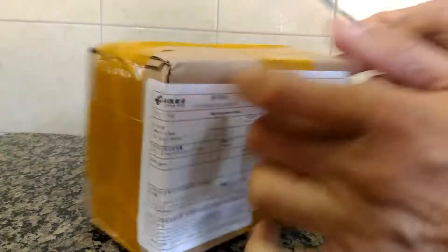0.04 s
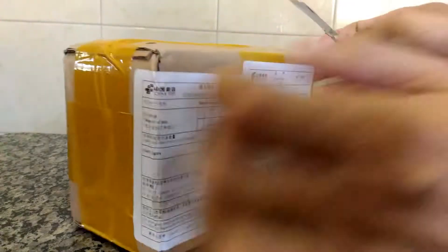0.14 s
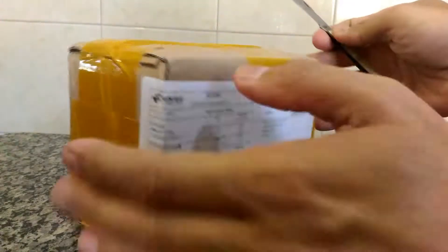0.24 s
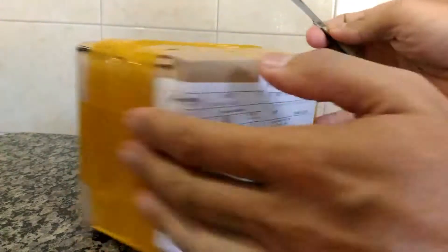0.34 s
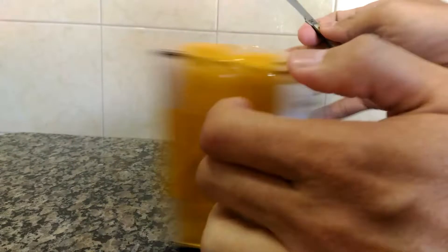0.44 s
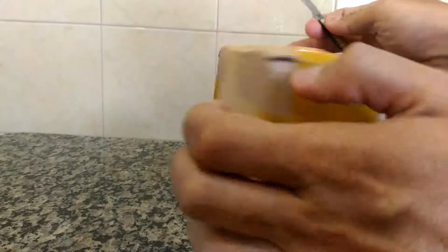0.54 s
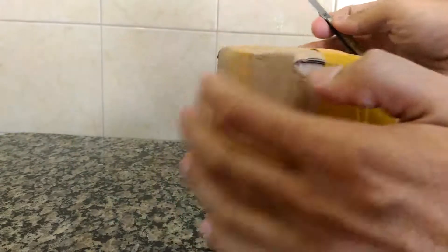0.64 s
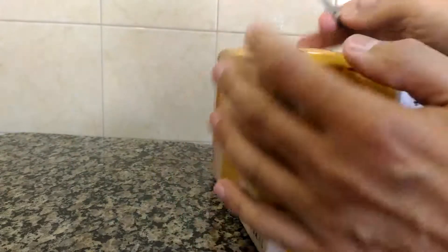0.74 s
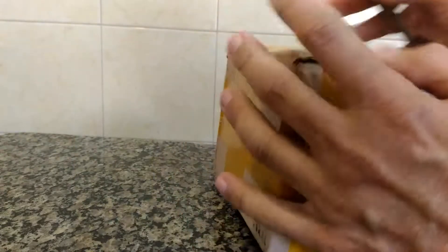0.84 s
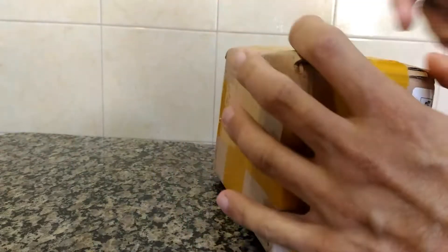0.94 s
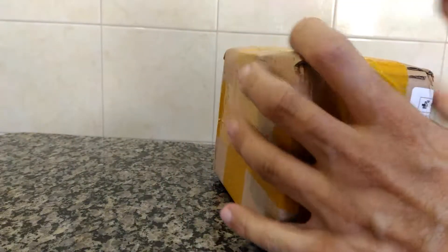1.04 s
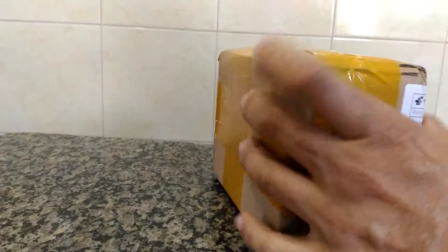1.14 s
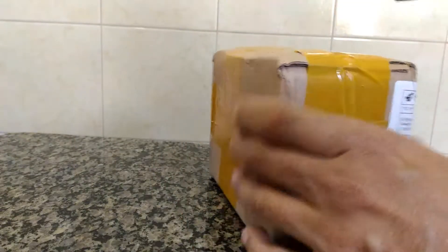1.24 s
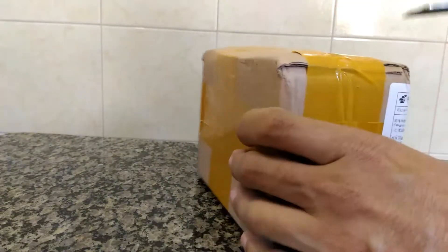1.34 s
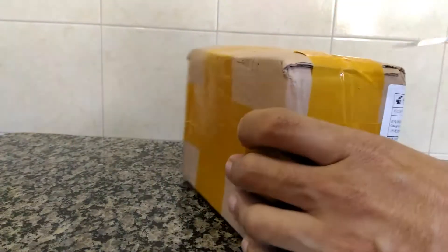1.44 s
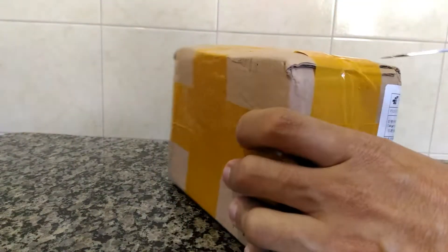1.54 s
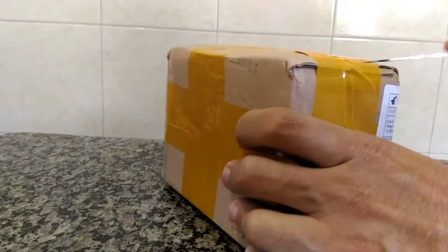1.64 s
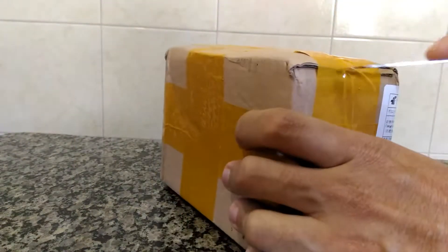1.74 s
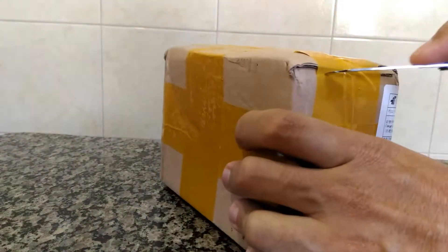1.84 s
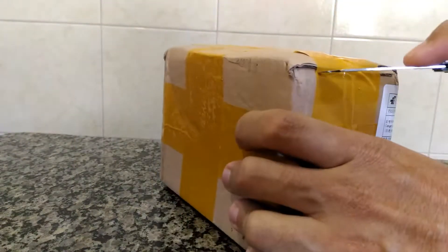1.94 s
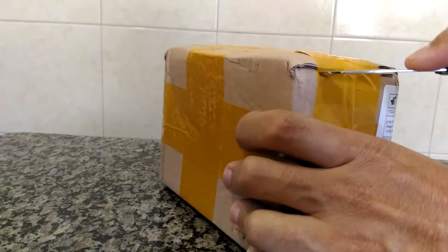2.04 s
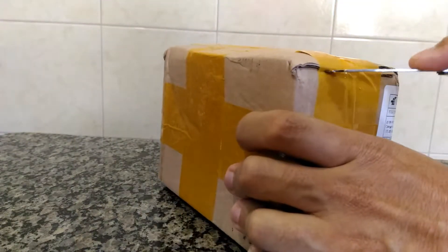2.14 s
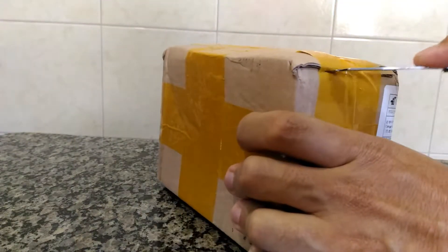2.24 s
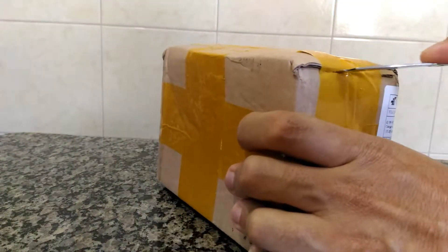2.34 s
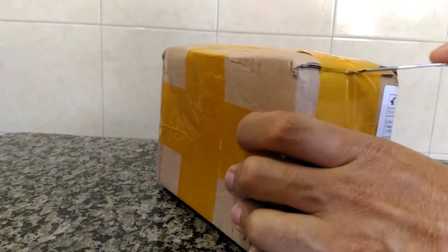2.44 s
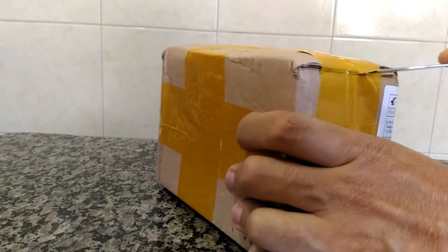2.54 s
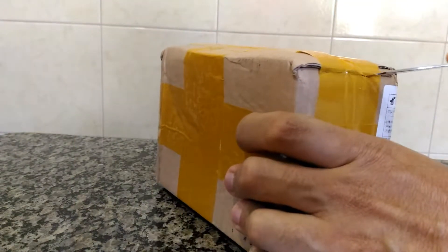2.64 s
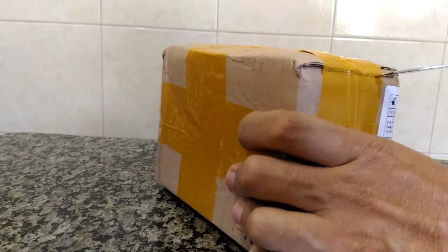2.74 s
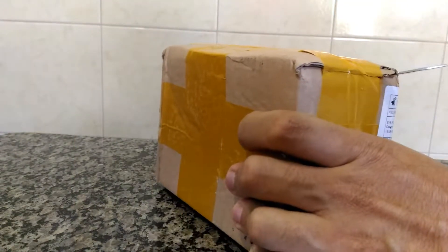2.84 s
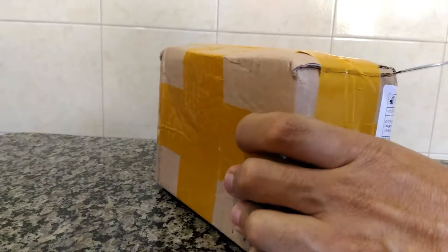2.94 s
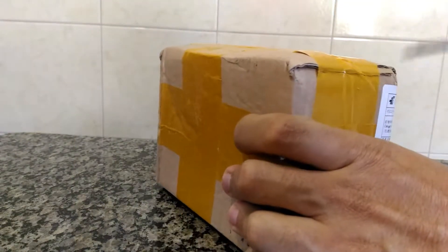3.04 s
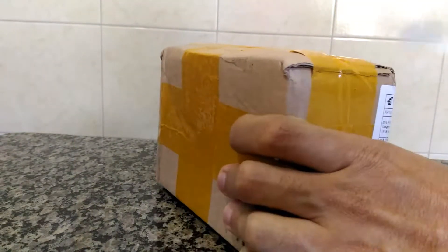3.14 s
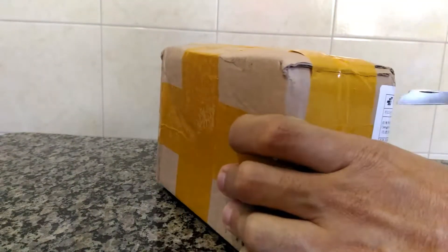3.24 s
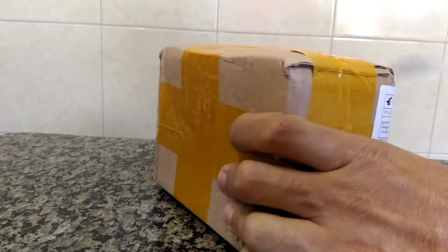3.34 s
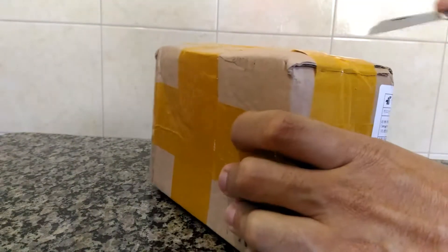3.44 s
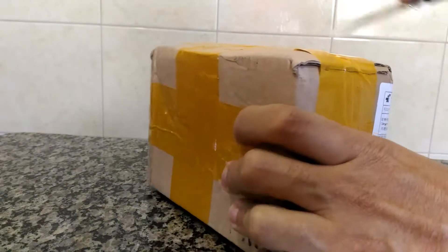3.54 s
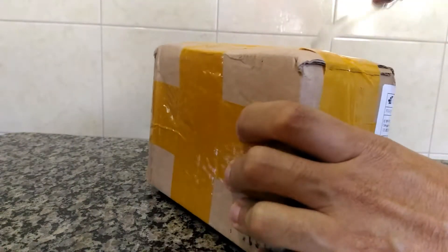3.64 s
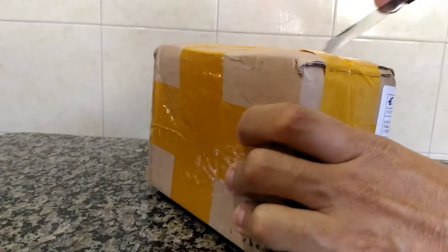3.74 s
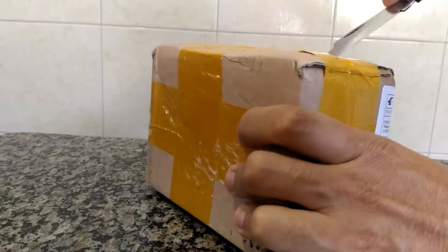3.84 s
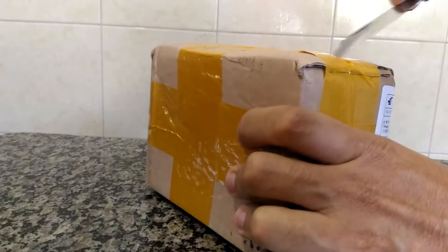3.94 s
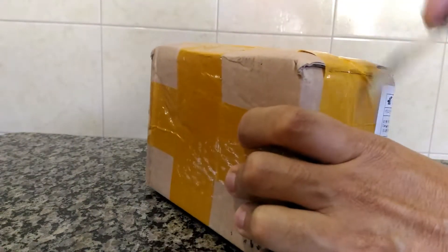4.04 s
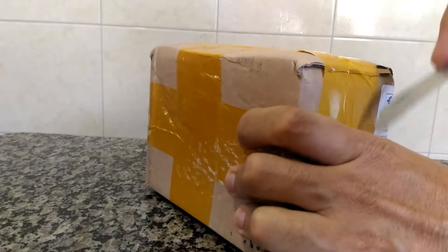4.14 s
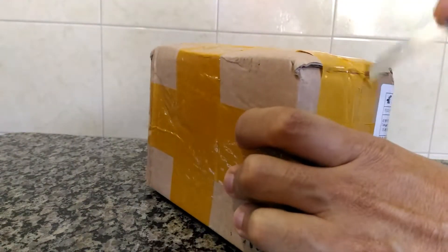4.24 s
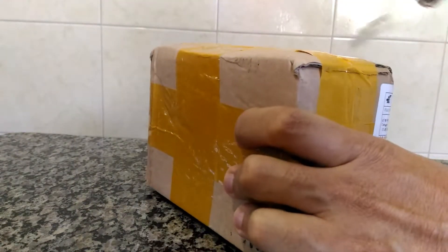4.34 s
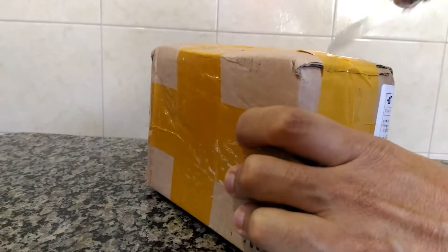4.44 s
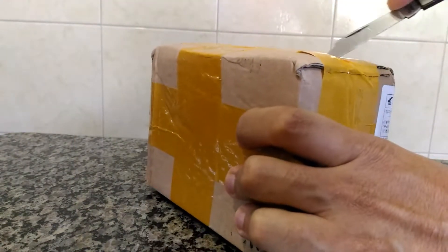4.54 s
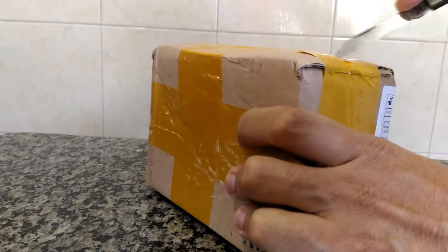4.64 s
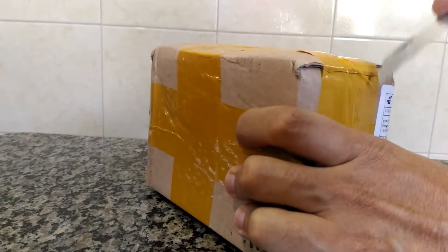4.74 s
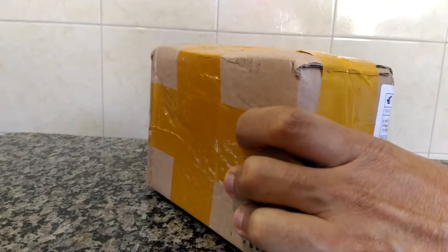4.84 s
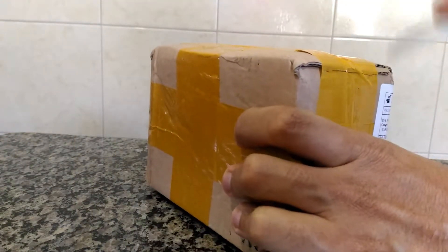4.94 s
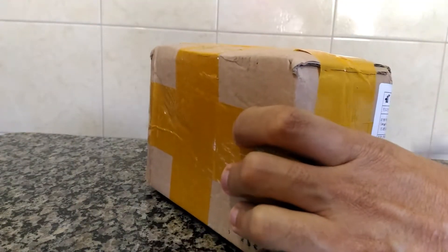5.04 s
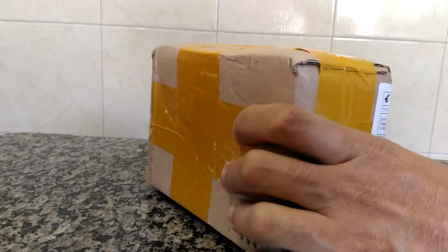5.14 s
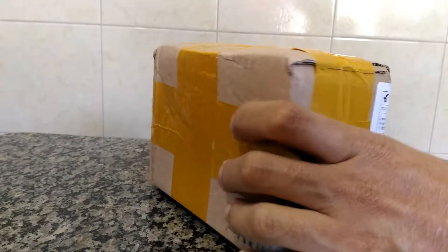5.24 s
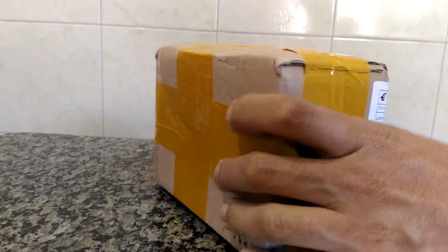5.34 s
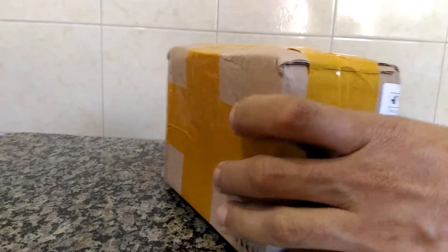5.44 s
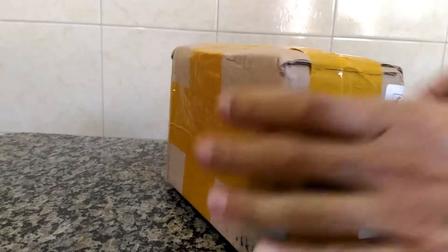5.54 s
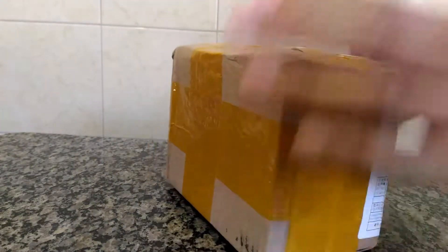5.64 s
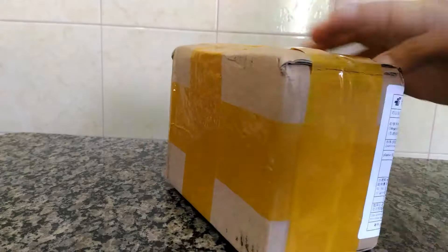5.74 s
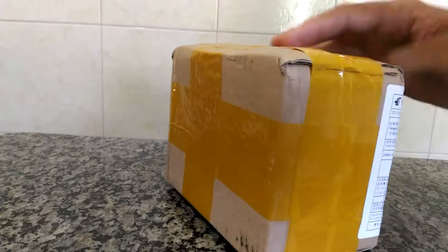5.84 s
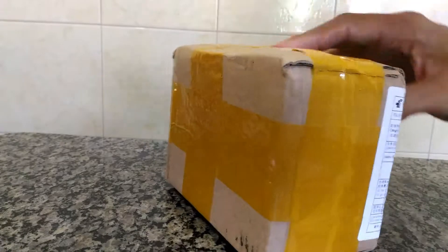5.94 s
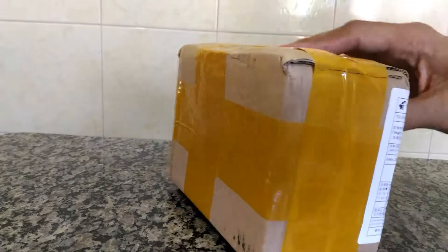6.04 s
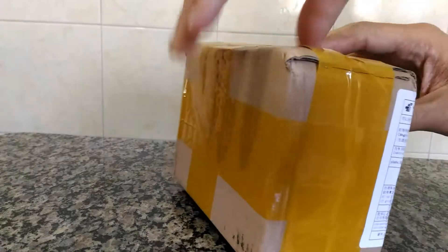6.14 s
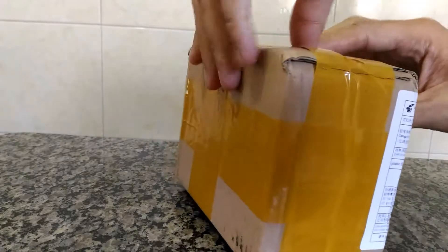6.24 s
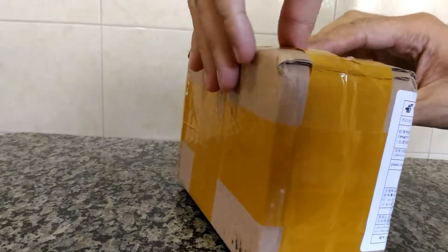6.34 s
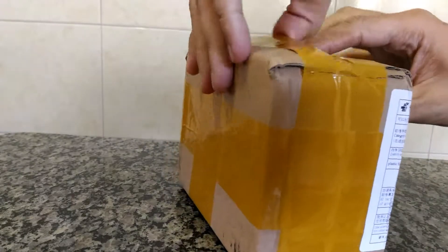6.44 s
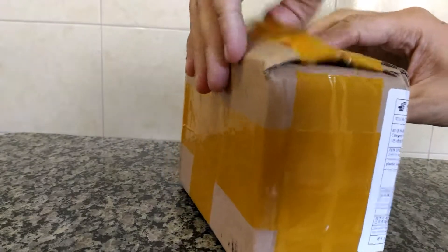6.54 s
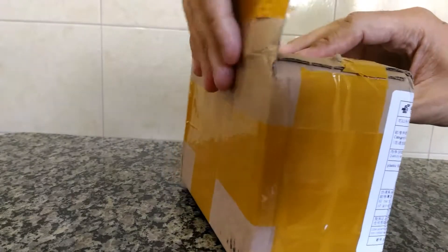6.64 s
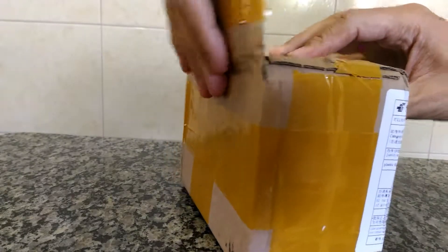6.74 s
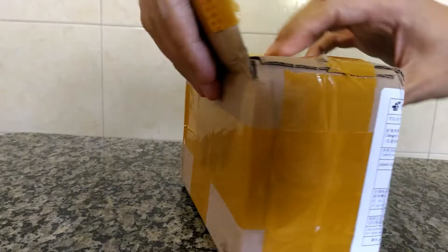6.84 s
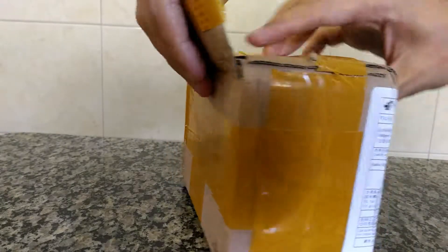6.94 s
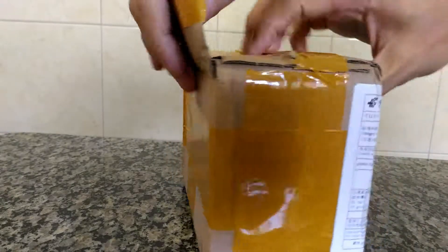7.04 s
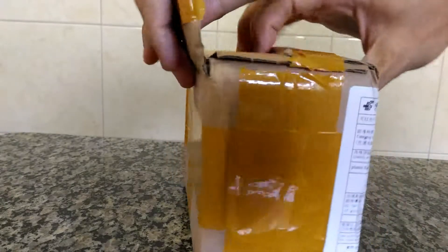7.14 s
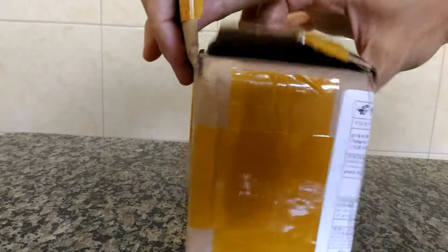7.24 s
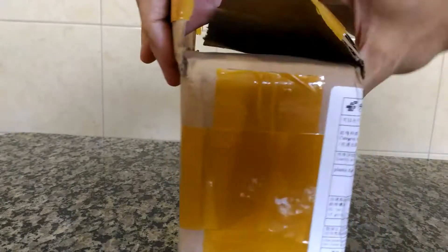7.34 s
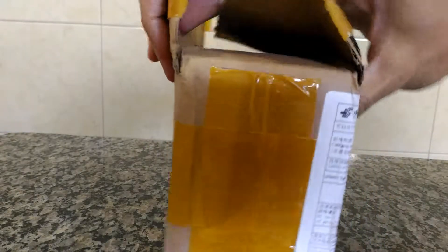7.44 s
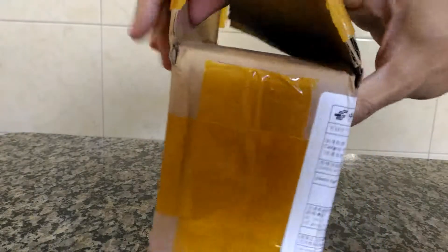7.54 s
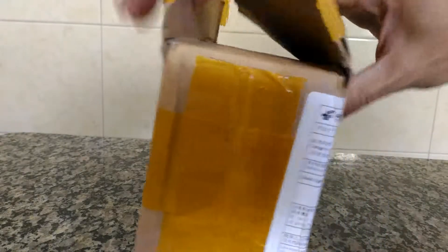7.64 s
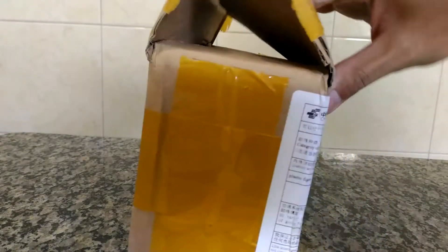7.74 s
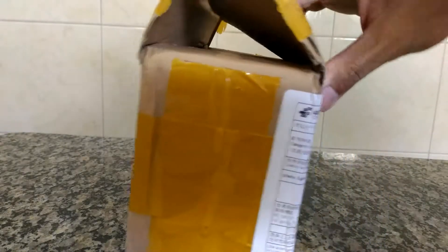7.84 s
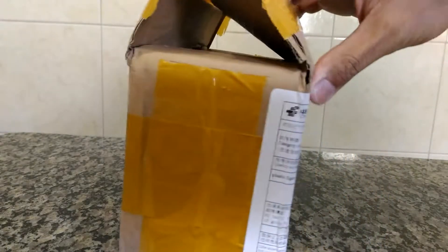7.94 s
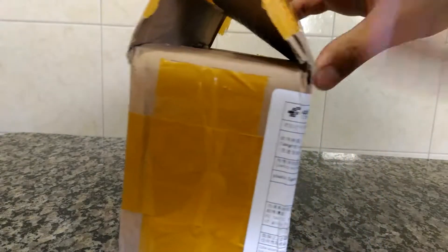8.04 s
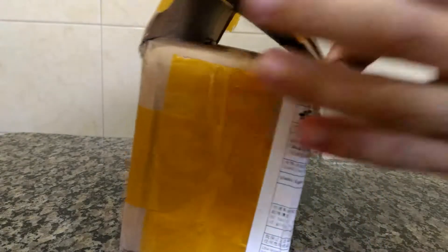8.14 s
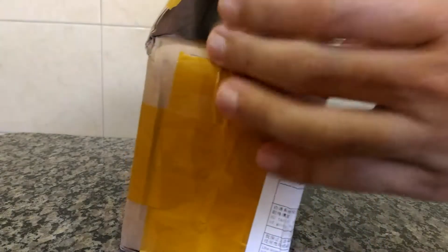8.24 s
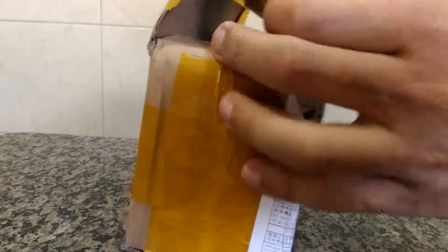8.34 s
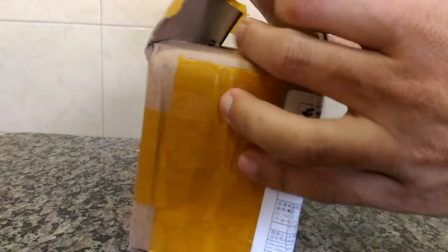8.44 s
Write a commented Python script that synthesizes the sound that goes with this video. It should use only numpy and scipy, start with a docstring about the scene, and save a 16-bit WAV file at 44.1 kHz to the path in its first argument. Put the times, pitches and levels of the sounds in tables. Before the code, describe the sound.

A close stereo microphone in a small, hard tiled room with quiet low background noise. From 0 to 2 seconds hands rub, bump and swish over a taped hollow cardboard box, with little crinkles and a scuff on stone near 1.0. From 2.2 to 2.9 a blade slips through tape in about nine crisp, uneven pops over soft box thumps. After faint rubbing, jabs and tiny rips come at 3.8 to 4.1, with more jabs near 4.75. At 5.2 to 5.55 the knife lands to the right, clacking and rattling with a short steel ring. A bump at 6.07 leads to rubbing; tape pops at 6.5 to 6.66, the last with a big hollow thump. Flaps scrape and groan from 7.26, a sharp snap hits at 7.38, ripping follows near 7.8, a smaller pop at 8.1, then final handling around 8.4.

```python
"""Hands rub, bump and crinkle a taped cardboard parcel as it is turned on a stone counter in a small tiled room.
A knife point then pops through the tape in short slips and jabs the seam, and the knife is put down on the stone.
The flaps are pulled up, groaning, and the last tape snaps. Each slip is a burst of noise grains shaped by tape
and card, with a thump from the hollow box's modes. Grains also make the rubs and the knife's clack and ring;
dense fading reflections and two standing waves make the room, over a quiet noise background."""
import sys
import numpy as np
from scipy import signal
from scipy.io import wavfile
from scipy.ndimage import uniform_filter1d

SR = 44100
rng = np.random.default_rng(int(sys.argv[2]) if len(sys.argv) > 2 else 0)


def inscribe(sig):
    """Save sig as 16-bit PCM at rate SR to the path in sys.argv[1].

    A 1-D sig is mono; a 2-D sig holds one channel per row.
    Samples are clipped to [-1, 1] before scaling.
    """
    pcm = np.round(np.clip(np.atleast_2d(sig).T, -1, 1) * 32767)
    wavfile.write(sys.argv[1], SR, pcm.astype(np.int16))


N = 373527  # length in samples

# grip shifts, blade drags and flap rubs: start_s, hold_s, skin_and_card_hiss_db, box_drone_db
RUB_STROKES = [(0, 0.22, -64, -60), (0.396, 0.24, -61, -59.5), (.8, .12, -76, -68),
               (1.115, 0.39, -63.5, -64), (1.5, 0.12, -63, -59), (1.87, 0.1, -87, -84),
               (2.103, 0.22, -97, -64), (2.33, .7, -63.5, -60), (3.033, 0.25, -78, -64),
               (3.56, 0.12, -66.5, -60), (3.747, .07, -63.5, -60), (4.264, 0.72, -84, -74),
               (4.53, .04, -67, -61), (4.686, .11, -61, -57), (5.867, 0.52, -71.5, -61),
               (6.405, .18, -59, -59), (6.66, 0.77, -61.5, -61), (7.26, 0.45, -54, -54.5),
               (8.013, 0.26, -58, -60.5), (8.407, .07, -49.5, -51)]
# a hand or the knife bumps the box: start_s, level_db, stiffness_tilt_db_per_octave of the box modes
BOX_BUMPS = [(0.0426, -51, -22), (0.169, -57, 5), (0.425, -51, 3), (0.439, -51, 3), (1.579, -59, -7),
             (3.674, -55.5, -8), (5.969, -59, 10), (6.068, -41.5, 8), (6.3212, -57.5, -1), (7.137, -50, 7),
             (7.715, -46.5, 9), (8.273, -55, -12), (8.3694, -55, 12.5)]
# tape crinkles under a finger or the blade: start_s, level_db
TAPE_CRINKLES = [(0.0435, -60.5), (0.085, -61.5), (0.094, -56.5), (0.423, -61), (0.438, -61), (1.993, -74),
                 (2.2027, -58), (2.771, -58), (3.214, -69), (3.7673, -62.5), (6.3213, -57), (7.081, -54.5),
                 (7.767, -55), (8.0666, -55.5), (8.3704, -50.5)]
# fingers sweep over the taped sides: start_s, length_s, level_db
FINGER_SWISHES = [(0.057, 0.023, -60), (0.513, 0.065, -55.5), (0.818, 0.037, -57.5), (1.145, 0.064, -57.5),
                  (1.245, 0.069, -57.5), (1.317, 0.081, -57.5), (1.427, 0.3, -70), (6.46, 0.18, -59.5),
                  (7.741, 0.064, -52)]
# the turning box or the knife scuffs the stone: start_s, length_s, level_db
STONE_SCUFFS = [(1.011, 0.05, -51), (5.345, .016, -52)]
# the blade slips forward through the tape:
# start_s, crack_db, card_knock_db (against the crack), box_thump_db, tape_pitch_hz
BLADE_SLITS = [(2.2093, -53, -0.5, -51.5, 7130), (2.226, -53.5, -7, -57, 5800),
               (2.394, -43.5, -9.5, -44.5, 6700), (2.4947, -38.5, -5.5, -47.5, 5230),
               (2.5602, -41.5, -8, -40.5, 5830), (2.6211, -40.5, -16, -42, 5120),
               (2.712, -43, -9.5, -58, 5140), (2.7771, -40, -17, -49.5, 5690),
               (2.8951, -38.5, -8, -40.5, 5240)]
# the knife point or a fingernail jabs the seam: start_s, crack_db, box_thump_db, top_panel_ring_db
SEAM_STABS = [(3.8255, -44.5, -43, -44.5), (4.0512, -42.5, -45.5, -70), (4.753, -47.5, -46, -59),
              (4.7876, -49.5, -46, -50.5), (4.7919, -52.5, -44.5, -56), (6.4069, -49, -44, -46)]
# the knife meets the stone: start_s, level_db, counter_thud_db
KNIFE_LANDINGS = [(5.2361, -48.5, -68), (5.327, -53.5, -79), (5.351, -68, -59.5), (5.391, -56, -59.5),
                  (5.4469, -35.5, -75), (5.5038, -33, -48.5), (5.549, -37.5, -78)]
# tape lets go as the flaps are pulled up: start_s, crack_db, box_thump_db, rise_s
TAPE_POPS = [(6.5141, -43.5, -45, 0.0016), (6.6227, -37.5, -34.5, 0.00097), (6.634, -38, -34, 0.0016),
             (6.6549, -34, -63, 0.0012), (6.6579, -34.5, -23, 0.00151), (7.3818, -32, -26, 0.00076),
             (8.0939, -42.5, -49, 0.00097)]
# a short stretch of tape peels off the card: start_s, level_db
TAPE_RIPS = [(3.891, -53.5), (4.06, -51.5), (4.092, -54), (4.109, -52), (7.365, -54), (7.476, -53),
             (7.552, -54), (7.7867, -41), (7.796, -50), (7.8117, -47.5), (8.0809, -55.5), (8.456, -53)]
# a flap drags over its neighbour and groans: start_s, length_s, level_db, flap_mode_hz
FLAP_GROANS = [(7.259, 0.029, -50.5, 407), (7.303, 0.033, -44, 453), (7.443, 0.102, -57, 402)]

# spectrum of tearing tape: frequency_hz, level_db
TAPE_SPECTRUM = [(900, -61), (2000, -28), (2800, 2), (3600, 1), (4600, 1), (5700, 2.5), (8400, -3),
                 (11000, -13), (15000, -21.5)]
# spectrum of tearing card: frequency_hz, level_db
CARD_SPECTRUM = [(300, -3.5), (700, 4.5), (1000, 4.5), (1500, 1), (2500, 3.5), (3500, -1), (6000, -14),
                 (12000, -37)]
# spectrum of skin and card rubbing on tape: frequency_hz, level_db
SKIN_SPECTRUM = [(500, -4.5), (1000, -3.5), (1800, -5.5), (3000, 1), (4500, -2), (6500, -3), (9000, -10),
                 (14000, -20)]
# spectrum of the knife's clack: frequency_hz, level_db
STEEL_SPECTRUM = [(200, -21), (420, 1), (900, -3.5), (1500, -1.5), (2500, -0.5), (5000, 1.5), (7500, -5),
                  (10000, -14), (14000, -26)]
# spectrum of the quiet background: frequency_hz, level_db
AIR_SPECTRUM = [(20, -25.5), (45, 5), (80, -5.5), (150, 2.5), (300, 0.5), (600, -10), (1200, -17),
                (3200, -18), (4400, -29.5), (10000, -38), (15000, -34.5)]

# modes of the hollow box: mode_hz, level_db, t60_s
BOX_MODES = [(120, -21, 0.02), (188, 1, 0.029), (268.5, -4, 0.055), (397, 7.5, 0.03), (453, -8.5, 0.084),
             (730, -13, 0.013)]
# mode of the top panel: mode_hz, level_db, t60_s
TOP_PANEL_MODE = [(770, 0, 0.014)]
# modes of the knife on the stone: mode_hz, level_db, t60_s
KNIFE_MODES = [(383.6, -2, 0.27), (493, -2.5, 0.34), (643, -4, 0.31), (1003, -1.5, 0.2), (1351, 0, .22),
               (1642, -1.5, 0.2), (1813, -2.5, 0.15), (2344, 2.5, 0.14), (3132, -1, 0.24), (3970, -5, 0.15),
               (4721, -11, 0.25), (5230, -6, 0.21), (6148, -13, 0.2), (6220, -8, 0.21)]
# standing waves of the room: mode_hz, level_db, t60_s
STANDING_WAVES = [(141.3, 4.5, 2.8), (176, -0.5, 0.96)]

# how long the tiles ring in each band: frequency_hz, t60_s
TILE_T60 = [(100, 1), (300, 0.74), (700, 0.68), (2000, 0.68), (5000, 0.55), (8000, 0.48), (14000, 0.51)]
# colour of the reflections: frequency_hz, level_db
TILE_COLOUR = [(60, -14), (150, 9), (280, -1), (420, -1.5), (1000, 1), (3000, 1.5), (7000, -0.5),
               (14000, 2)]
# left-right likeness of the reflections: frequency_hz, likeness (0 to 1)
TILE_LIKENESS = [(130, 0.8), (300, 1), (640, 0.027), (1400, 0), (3000, 0)]
# colour of the left microphone port, which has a resonance: frequency_hz, level_db
LEFT_PORT = [(100, -1.5), (2500, 3), (4600, 3.5), (5500, 7.5), (6500, 14), (7400, 9), (8600, 6.5),
             (11000, 4.5), (14500, 0)]
# colour of the right microphone port: frequency_hz, level_db
RIGHT_PORT = [(100, -9), (700, -3.5), (2500, -4), (5200, -2), (7000, -6.5), (10000, -4), (14500, -8)]

AIR_DB = -65.5
EDGE_HZ = 14700  # upper band limit
RUB_ATTACK_S, RUB_RELEASE_S = 0.05, 0.052  # swell time, and decay constant after the hold
SWISH_HZ, SWISH_OCTAVES = 6580, 0.57
SCUFF_HZ, SCUFF_OCTAVES = 3340, 0.71
TWANG_DB, TWANG_RISE_S = -9.5, 0.004  # level against the crack, and time to the peak
TWANG_END, TWANG_FALL_S = 0.62, 0.00218  # pitch falls towards this share as the slit lengthens
SETTLE_DB, SETTLE_S = -18.5, 0.064  # level against the pop, and decay constant


def amp(db):
    """Decibels to linear gain."""
    return 10 ** (np.asarray(db) / 20)


def evened(x):
    """Scales a sound to an RMS level of 1."""
    return x / np.sqrt(np.mean(x ** 2) + 1e-20)


def blow(x):
    """Scales a short sound to the energy of a hundredth of a second at level 1."""
    return x * np.sqrt(SR / 100 / (np.sum(x ** 2) + 1e-20))


def read(points, hz):
    """Reads a curve at the given frequencies, on a logarithmic frequency axis."""
    f, value = np.transpose(points)
    return np.interp(np.log(hz + 1), np.log(f + 1), value)


def add(mix, s, sound):
    """Mixes a sound in at the given time."""
    part = mix[..., max(round(s * SR), 0):][..., :sound.shape[-1]]
    part += sound[..., :part.shape[-1]]


def through(x, response):
    """Convolves a sound with an impulse response and keeps its length."""
    return signal.fftconvolve(x, response)[:len(x)]


def colour(points, size=2048):
    """Causal impulse response with the given spectrum, by way of minimum phase."""
    log_gain = np.log(amp(read(points, abs(np.fft.fftfreq(size, 1 / SR)))))
    spectrum = np.exp(np.conj(signal.hilbert(log_gain)))
    return np.fft.ifft(spectrum).real[:size // 2]


def ring(modes, size):
    """Impulse response of a set of dying modes."""
    t = np.arange(size) / SR
    return sum(amp(db - 60 * t / t60) * np.cos(2 * np.pi * hz * t) for hz, db, t60 in modes)


def grains(n, per_s, spread_db):
    """Tiny slips at random moments; a positive spread makes a few much larger, a negative one smaller."""
    sizes = amp(spread_db * np.minimum(rng.exponential(1, n), 4)) * rng.choice([-1, 1], n)
    return sizes * (rng.random(n) < per_s / SR)


def air():
    """Quiet background of the room: coloured noise, half shared by both ports and half separate."""
    shared, left, right = (evened(through(rng.standard_normal(N), colour(AIR_SPECTRUM))) for _ in range(3))
    return amp(AIR_DB) * (shared + np.array([left, right])) / np.sqrt(2)


def rubbing(hiss_db=-3, drone_db=-2, flutter_db=3.0):
    """Skin and card catch in fine grains that hiss on the tape and stir the box modes."""
    t = np.arange(N) / SR
    hiss, drone = np.zeros((2, N))
    for s, hold, rub_hiss_db, rub_drone_db in RUB_STROKES:
        swell = np.clip((t - s) / RUB_ATTACK_S, 0, 1)
        stroke = swell * np.exp(-np.maximum(t - s - hold, 0) / RUB_RELEASE_S)
        # where strokes overlap, the stronger one is heard
        hiss = np.maximum(hiss, amp(rub_hiss_db) * stroke)
        drone = np.maximum(drone, amp(rub_drone_db) * stroke)
    # the pressure flutters at random
    wander = uniform_filter1d(uniform_filter1d(rng.standard_normal(N), 500), 300)
    pressure = amp(flutter_db * evened(wander))
    top = evened(through(pressure * grains(N, per_s=3500, spread_db=2.5), colour(SKIN_SPECTRUM)))
    body = evened(through(pressure * grains(N, per_s=900, spread_db=0.5), ring(BOX_MODES, size=6000)))
    return amp(hiss_db) * hiss * top + amp(drone_db) * drone * body


def tearing(burst, response):
    """One avalanche of tiny tears under the given envelope, coloured by the material."""
    return blow(through(burst * grains(len(burst), per_s=22000, spread_db=2.5), response))


def snap(crack_db, thump_db, rise_s, pitch_hz, card_db, stiffness_db, room_db, size=5000, tape_hz=5400,
         lag=1.487, shove=0.19, shove_s=0.0004, scatter_s=0.0032, aside=0.99):
    """A slip tears tape and card in milliseconds; the released wall springs back and thumps.

    Rows: left, right, towards the walls."""
    t = np.arange(size) / SR
    # taut tape cracks higher; a blow on a stiff edge favours the upper modes of the box
    tape = colour([(hz * pitch_hz / tape_hz, db) for hz, db in TAPE_SPECTRUM])
    card = colour(CARD_SPECTRUM)
    box = ring([(hz, db + stiffness_db * np.log2(hz), t60) for hz, db, t60 in BOX_MODES], size=size)
    u = t / max(rise_s, 1e-4)
    burst = u ** 2 * np.exp(-1.7 * u)
    # the crumpled sheet radiates differently each way; hands and counter scatter what goes out to the walls
    scattered = through(burst, np.exp(-t / scatter_s))
    ahead, sideways, outward = (
        amp(crack_db) * (tearing(shape, tape) + amp(card_db) * tearing(shape, card))
        for shape in (burst, burst, scattered))
    # a smooth shove lags the start of the tear, with rough noise beside it
    push = shove * blow(np.exp(-((t - lag * rise_s) / shove_s) ** 2))
    release = push + blow(burst * rng.standard_normal(size)) / 3
    thump = amp(thump_db) * blow(through(release, box))
    left = ahead + thump
    right = .5 * ahead + aside * sideways + 1.54 * thump
    return np.array([left, right, amp(room_db) * (outward + thump)])


def touches(crinkle_thump_db=-14, bump_crack_db=-25):
    """A crinkle is nearly all tape, a bump nearly all box."""
    out = np.zeros((3, N))
    for s, db in TAPE_CRINKLES:
        add(out, s, snap(db, db + crinkle_thump_db, rise_s=0.0012, pitch_hz=6060,
                         card_db=-9.5, stiffness_db=-1, room_db=-3.5))
    for s, db, stiffness_db in BOX_BUMPS:
        add(out, s, snap(db + bump_crack_db, db, rise_s=0.00121, pitch_hz=5100,
                         card_db=1, stiffness_db=stiffness_db, room_db=-2))
    return out


def glide(length, db, centre_hz, octaves, skirt_db=-24):
    """Very fine grains in one broad band, swelling and fading with the stroke."""
    n, hz = round(length * SR), np.geomspace(200, 16000, num=40)
    band_db = np.maximum(-6 * (np.log2(hz / centre_hz) / octaves) ** 2, skirt_db)
    hiss = evened(through(grains(n, per_s=18000, spread_db=-2), colour(np.c_[hz, band_db])))
    return amp(db) * hiss * np.sin(np.pi * np.linspace(0, 1, n) ** 0.92)


def swishes(swish_db=-3):
    """Dry skin glides on smooth tape; a scuff on stone sounds about an octave lower."""
    out = np.zeros(N)
    for s, length, db in FINGER_SWISHES:
        add(out, s, glide(length, db, SWISH_HZ, SWISH_OCTAVES))
    for s, length, db in STONE_SCUFFS:
        add(out, s, glide(length, db, SCUFF_HZ, SCUFF_OCTAVES))
    return amp(swish_db) * out


def twang(hz, size=2000):
    """The freed edge of the tape twangs just after a slip: a very short falling note."""
    t = np.arange(size) / SR
    pitch = hz * (TWANG_END + (1 - TWANG_END) * np.exp(-t / TWANG_FALL_S))
    u = t / TWANG_RISE_S
    return blow(u ** 2 * np.exp(-2 * u) * np.sin(2 * np.pi * np.cumsum(pitch) / SR))


def cutting(twang_right_db=-6, twang_room_db=-14, size=5000):
    """Slitting is mostly tape over a soft thump; a jab goes into the card and rings the top panel."""
    out, panel = np.zeros((3, N)), blow(ring(TOP_PANEL_MODE, size=size))
    twang_gains = amp([[0], [twang_right_db], [twang_room_db]])
    for s, db, card_db, thump_db, hz in BLADE_SLITS:
        add(out, s, snap(db, thump_db, rise_s=.0016, pitch_hz=hz,
                         card_db=card_db, stiffness_db=-1.5, room_db=-5.0))
        add(out, s, amp(db + TWANG_DB) * twang(hz) * twang_gains)
    for s, db, thump_db, panel_db in SEAM_STABS:
        add(out, s, snap(db, thump_db, rise_s=.001, pitch_hz=4970,
                         card_db=-3.5, stiffness_db=5.5, room_db=0.0))
        add(out, s, amp(panel_db) * panel)
    return out


def knife(size=20000, clack_s=0.0047, ring_db=-5.0, thud_hz=140, thud_s=0.011):
    """Handle and blade land in turn and rattle: a clack, briefly ringing steel and a dull thud."""
    out, t = np.zeros(N), np.arange(size) / SR
    steel, modes = colour(STEEL_SPECTRUM), ring(KNIFE_MODES, size=size)
    thud = blow(np.sin(2 * np.pi * thud_hz * t) * np.exp(-t / thud_s))
    for s, db, thud_db in KNIFE_LANDINGS:
        contact = grains(size, per_s=9000, spread_db=2.5) * np.exp(-t / clack_s)
        clack = blow(through(contact, steel))
        ringing = blow(through(contact, modes))
        add(out, s, amp(db) * (clack + amp(ring_db) * ringing) + amp(thud_db) * thud)
    return out


def opening(rip_thump_db=-3):
    """Tape under strain pops off at once and jolts the box; slack tape peels more slowly and pushes it less."""
    out = np.zeros((3, N))
    for s, db, thump_db, rise_s in TAPE_POPS:
        add(out, s, snap(db, thump_db, rise_s, pitch_hz=5400, card_db=0, stiffness_db=7, room_db=-4.5))
    for s, db in TAPE_RIPS:
        add(out, s, snap(db, db + rip_thump_db, rise_s=0.00243, pitch_hz=5500,
                         card_db=0.0, stiffness_db=-2.5, room_db=0.4))
    return out


def settling(card_db=-2):
    """The creased card settles after each pop: stray little cracks of tape and card, dying away."""
    t = np.arange(N) / SR
    strain = sum(amp(db) * (t > s) * np.exp(-abs(t - s) / SETTLE_S) for s, db, _, _ in TAPE_POPS)
    tape, card = (evened(through(grains(N, per_s=370, spread_db=2.0), colour(points)))
                  for points in (TAPE_SPECTRUM, CARD_SPECTRUM))
    return amp(SETTLE_DB) * strain * (tape + amp(card_db) * card) / 2


def groans(groan_t60=0.095, slips_per_s=700, size=5000):
    """A flap sticks and slips, and rings on in its own mode."""
    out = np.zeros(N)
    for s, length, db, hz in FLAP_GROANS:
        n = round(length * SR)
        slips = grains(n, per_s=slips_per_s, spread_db=5.0) * signal.windows.tukey(n)
        # silence after the slips leaves space for the ring
        groan = through(np.pad(slips, (0, size)), ring([(hz, 0, groan_t60)], size=size))
        add(out, s, amp(db) * groan / (np.std(groan[:n]) + 1e-9))
    return out


def tiles(first_s=0.0048, size=44100):
    """Dense reflections off the tiles for both ports, most alike in the bass, each band dying at its own speed."""
    t = np.arange(size) / SR
    taps = rng.choice([-1, 1], (2, size)) * (rng.random((2, size)) < 5000 / SR) * (t > first_s)
    hz, when, (a, b) = signal.stft(taps, SR, nperseg=256)
    same = np.clip(read(TILE_LIKENESS, hz), -1, 1)[:, None]
    fade_db = -60 * when / read(TILE_T60, hz)[:, None]
    pair = np.array([a, same * a + np.sqrt(1 - same ** 2) * b])
    shaped = pair * amp(fade_db + read(TILE_COLOUR, hz)[:, None])
    tails = signal.istft(shaped, SR, nperseg=256)[1]
    return tails / np.linalg.norm(tails[0])


def room(x, boom_db=-21, turns_per_s=1.7, size=88200):
    """Two sets of dense reflections trade steadily, so that like hits do not get identical tails;
    two standing waves linger under them."""
    turn = 2 * np.pi * turns_per_s * np.arange(N) / SR
    echoes = np.zeros((2, N))
    for share in (np.cos(turn), np.sin(turn)):
        echoes += np.array([through(x * share, tail) for tail in tiles()])
    boom = ring(STANDING_WAVES, size=size)
    return echoes + amp(boom_db) * through(x, boom / np.linalg.norm(boom))


def scene(rub_near_db=-3, rub_room_db=-3, knife_left_db=-8, knife_right_db=-3, knife_room_db=2,
          left_db=2, right_db=-2):
    """The box is close and faces the left port; the knife lands to the right, heard mostly by way of the walls."""
    *near, far = touches() + cutting() + opening()
    handling = rubbing() + swishes() + settling() + groans()
    steel = knife()
    left, right = (np.array(near) + amp(rub_near_db) * handling) * amp([[left_db], [right_db]])
    # the right port is a few samples further from the box
    parcel = np.array([left, np.pad(right, (3, 0))[:N]])
    landed = steel * amp([[knife_left_db], [knife_right_db]])
    walls = room(far + amp(rub_room_db) * handling + amp(knife_room_db) * steel)
    return parcel + landed + walls + air()


def record(dry, low_cut_hz=42):
    """Colour of each port, a low cut, then the band limit."""
    ports = np.array([through(x, colour(port)) for x, port in zip(dry, (LEFT_PORT, RIGHT_PORT))])
    ports = signal.sosfilt(signal.butter(3, low_cut_hz, "high", fs=SR, output="sos"), ports)
    band_limit = signal.firwin(121, EDGE_HZ, window=("kaiser", 8), fs=SR)
    return signal.oaconvolve(ports, band_limit[None], "same")


dry = scene()
out = record(dry)
inscribe(out)
```